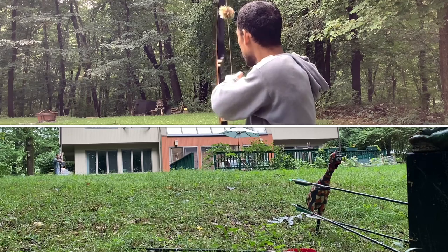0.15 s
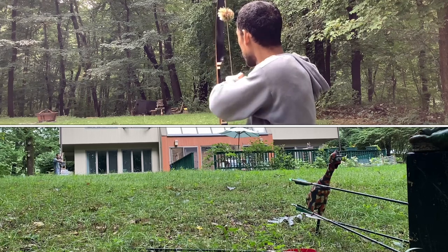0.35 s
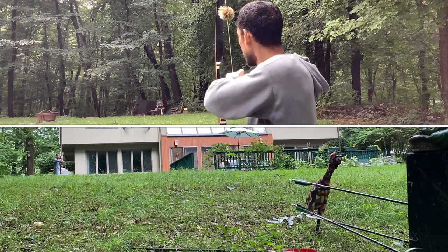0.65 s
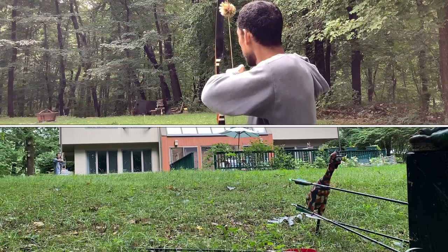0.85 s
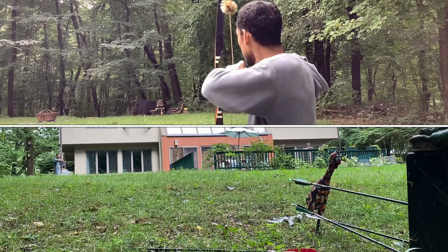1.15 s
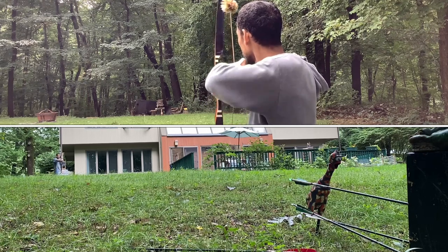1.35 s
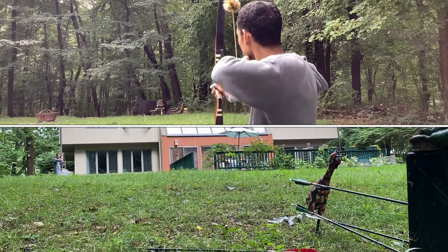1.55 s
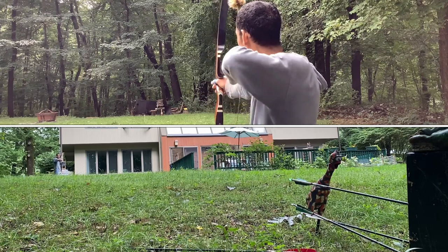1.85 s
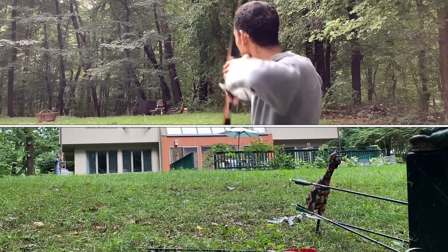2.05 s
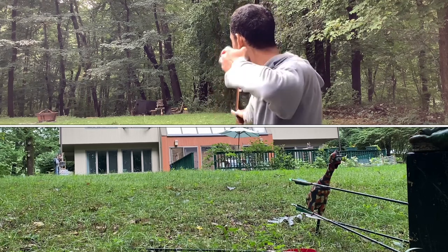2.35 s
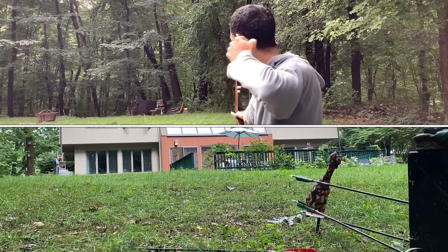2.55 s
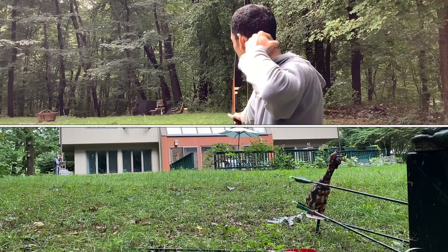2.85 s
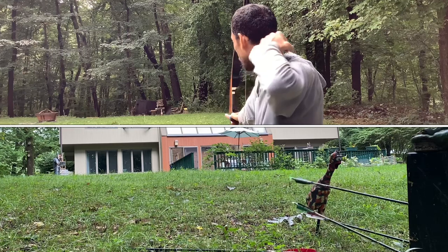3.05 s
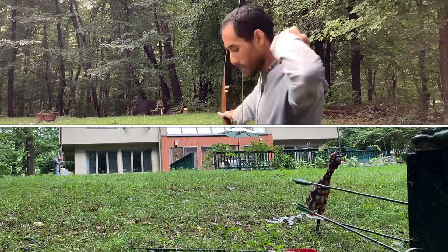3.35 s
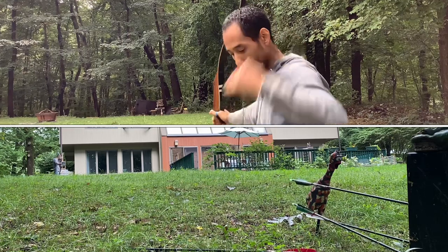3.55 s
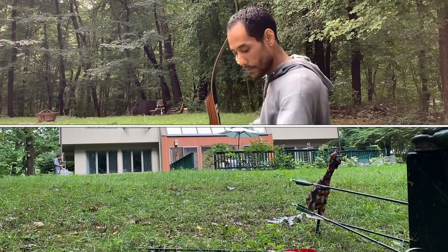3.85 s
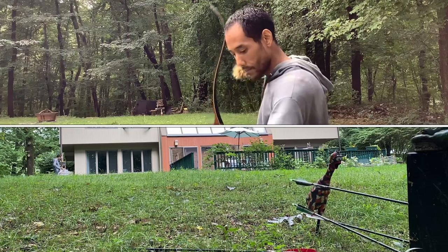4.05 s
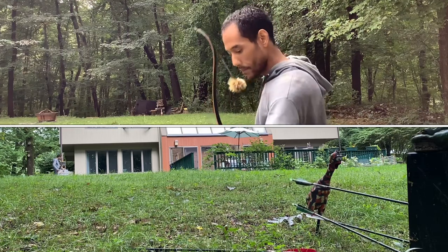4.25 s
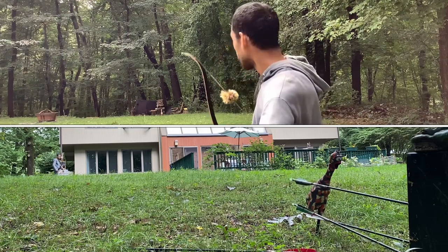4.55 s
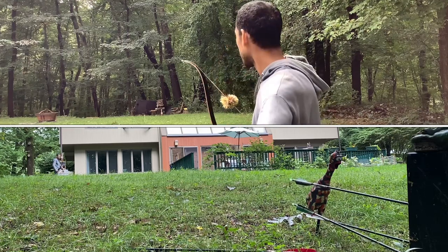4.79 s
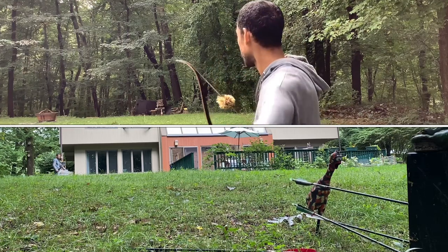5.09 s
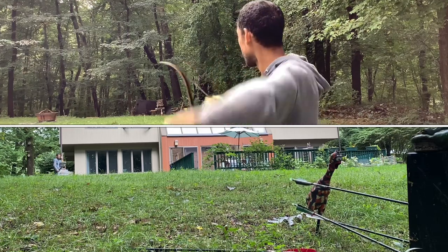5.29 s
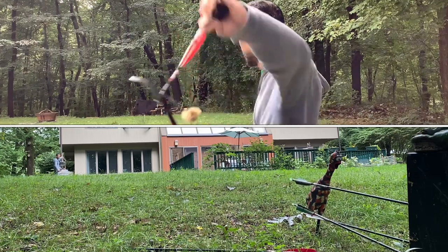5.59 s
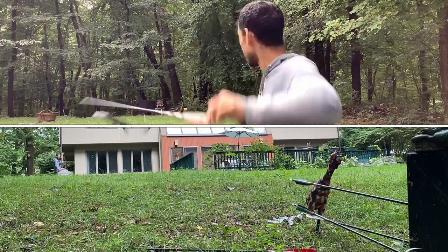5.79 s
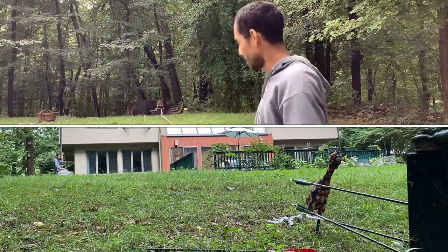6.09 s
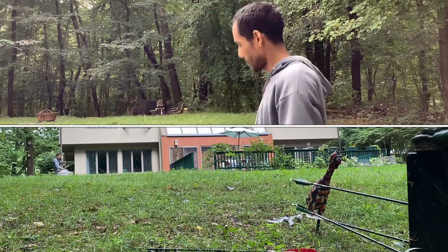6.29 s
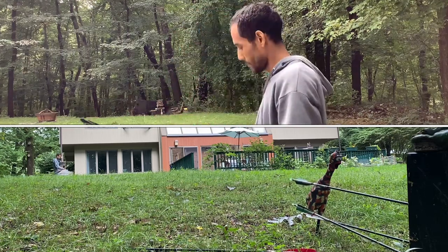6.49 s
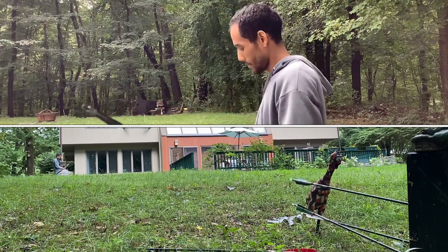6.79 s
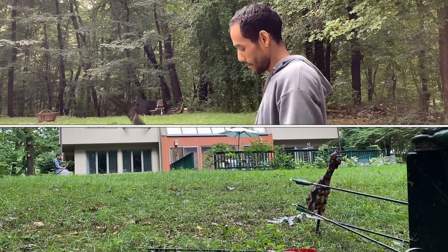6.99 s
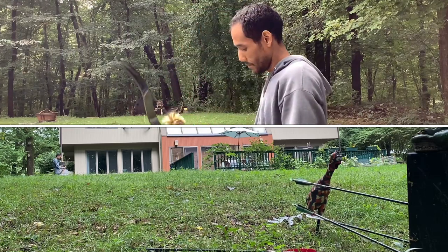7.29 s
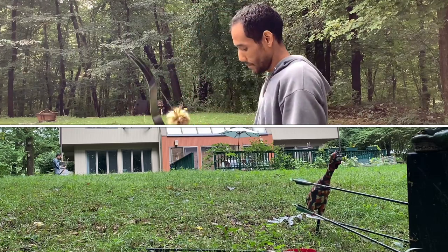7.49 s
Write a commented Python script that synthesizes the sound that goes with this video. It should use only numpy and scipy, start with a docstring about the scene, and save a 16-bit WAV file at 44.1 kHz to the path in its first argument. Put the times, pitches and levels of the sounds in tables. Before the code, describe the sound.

A bow lets go with a light woody snap, an arrow thumps sharply into a close target, then sleeve rustle and small knocks over steady crickets.

```python
"""Wooded yard: an archer's arrow slides past the bow as noise, the string thrums as dying modes and feathers hiss.
Half a second later it thumps into a target near a stereo microphone: falling sweep, noise crack, thud and echoes;
the target settles with small knocks and rubs. Near the archer, in mono, a sleeve rustles (grainy noise), bow and
shafts knock (sparks and wooden modes), and the next arrow scrapes out of the quiver (noise through tube resonances).
Crickets chirr (throbbing noise) over far traffic (shaped noise); one engine (wavering sines) revs and changes gear."""
import sys
import numpy as np
from scipy import signal
from scipy.fft import rfft, irfft, next_fast_len
from scipy.io import wavfile
from scipy.ndimage import uniform_filter1d

SR = 44100
rng = np.random.default_rng(int(sys.argv[2]) if len(sys.argv) > 2 else 0)


def store_wav(level_fs):
    """Save 16-bit WAV to argv[1]."""
    pcm = np.round(np.clip(np.atleast_2d(level_fs), -1, 1) * 32767)
    wavfile.write(sys.argv[1], SR, pcm.T.astype(np.int16))


N = 336483
STRIKE_S = 2.3936  # arrow meets target

# Wooden modes of the knocking parts. Each row: frequency in Hz, width in Hz, relative level in dB.
WOOD_MODES = [(855, 380, -1), (1440, 390, -3.5), (2140, 440, -4), (2530, 870, -10.5), (4000, 1700, -15)]


def gain_of(db):
    """dB to amplitude gain."""
    return 10 ** (np.asarray(db) / 20)


def evened(x):
    """Scales to rms 1."""
    return x / np.sqrt(np.mean(x ** 2) + 1e-20)


def read(points, hz):
    """Interpolates a table on a log-frequency axis."""
    f, value = np.transpose(points)
    return np.interp(np.log(hz + 1), np.log(f + 1), value)


def add(mix, start_s, sound):
    """Mixes a sound in at a time, cut at the end of the mix."""
    part = mix[..., round(start_s * SR):][..., :sound.shape[-1]]
    part += sound[..., :part.shape[-1]]


def curve(rows):
    """Interpolates the columns of a timed table at every sample of its span."""
    s, *columns = np.transpose(rows)
    t = np.arange(s[0], s[-1], 1 / SR)
    return [np.interp(t, s, c) for c in columns]


def colour(x, points):
    """Shapes a signal by a relative spectrum, rms 1."""
    size = next_fast_len(x.shape[-1])
    gain = gain_of(read(points, np.fft.rfftfreq(size, 1 / SR)))
    return evened(irfft(rfft(x, size) * gain, size)[..., :x.shape[-1]])


def resonate(x, hz, width_hz):
    """One-pole resonance, shifted to follow the frequency hz."""
    turn = np.exp(2j * np.pi * np.cumsum(hz * np.ones(len(x))) / SR)
    r = np.exp(-np.pi * width_hz / SR)
    return 2 * (turn * signal.lfilter([1 - r], [1, -r], x / turn)).real


def ring(modes):
    """Exponentially dying modes after one soft blow."""
    t = np.arange(SR // 3) / SR
    rise = 1 - np.exp(-t / 0.003)
    return rise * sum(gain_of(db - 60 * t / t60_s) * np.sin(2 * np.pi * hz * t) for hz, db, t60_s in modes)


def swell(rise_s, hold_s, fall_s):
    """Envelope that climbs, holds and falls linearly in dB, offset to end in silence."""
    range_db = 25
    end_s = rise_s + hold_s + fall_s
    t = np.arange(0, end_s, 1 / SR)
    db = np.interp(t, [0, rise_s, rise_s + hold_s, end_s], [-range_db, 0, 0, -range_db])
    return (gain_of(db) - gain_of(-range_db)) / (1 - gain_of(-range_db))


def from_target(x):
    """Off to the right of the stereo microphone: the left port hears it later."""
    port_lag_s = .000272
    return np.array([np.pad(x, (round(port_lag_s * SR), 0))[:len(x)], x])


def strike():
    """A bending wave in the target, treble first, sweeps down; the body thuds in low modes."""
    # Each row: frequency in Hz, level in dB, t60 in s.
    thud_modes = [(76.6, -11.5, 0.07), (122, -22, 0.075), (247, -20, 0.062), (503, -40, .08),
                  (740, -29, 0.061)]
    thud_s = 2.4145
    from_hz, to_hz, sink_s = 1230, 200, .005
    rise_s, last_s, fall_s = 0.0049, 0.012, 0.0083
    sweep_db, sag_db_per_s = -6, 470
    shape = swell(rise_s, last_s - rise_s, fall_s)
    t = np.arange(len(shape)) / SR
    shape = shape * gain_of(sweep_db - sag_db_per_s * np.maximum(t - rise_s, 0))
    hz = to_hz + (from_hz - to_hz) * np.exp(-t / sink_s)
    turns = np.cumsum(hz) / SR
    # a faster wave rides on top
    upper = gain_of(6.5 - 60 * t / 0.025) * np.sin(2 * np.pi * 1.95 * turns)
    hit = np.zeros(SR)
    add(hit, 0, shape * (np.sin(2 * np.pi * turns) + upper))
    add(hit, thud_s - STRIKE_S, ring(thud_modes))
    return hit


def returns():
    """Impulse response of the yard: echoes off house and trees, smeared by leaves and walls, over a short tail."""
    # Each row: delay in s, relative level in dB.
    echoes = [(.037, -29), (.052, -25.5), (.084, -29), (.096, -23), (.135, -24), (.15, -27), (.21, -34)]
    # Each row: frequency in Hz, relative level in dB.
    tail_colour = [(60, -34), (150, -3), (400, -3.5), (800, -6), (1500, -17), (4000, -1.5)]
    t = np.arange(SR) / SR
    tail = rng.standard_normal((2, SR)) * gain_of(-46.0 - 60 * t / 0.5) * (t > .012)
    age = t[:1500]
    for delay_s, echo_db in echoes:
        smear = gain_of(echo_db - 17.5 - 60 * age / 0.032) * (1 - np.exp(-age / .004))
        add(tail, delay_s, smear * rng.standard_normal(1500))
    return colour(tail, tail_colour) * tail.std()


def crack():
    """The point splits the fibres: ragged noise, creaking on, with one echo off a flat wall."""
    # Each row: frequency in Hz, relative spectrum in dB per Hz.
    crack_colour = [(700, -30), (1100, -3), (1690, 3), (3150, -8.5), (3550, -28), (4000, -8.5), (5380, -11),
                    (6430, -7.5), (8830, -27), (11100, -21.5), (16000, -28)]
    crack_db, echo_delay_s, echo_db = -15, .083, -15
    t = np.arange(SR) / SR
    ragged = gain_of(5.7 * evened(uniform_filter1d(rng.standard_normal(SR), size=30)))
    shared, left, right = ragged * rng.standard_normal((3, SR))
    noise = colour(from_target(shared) + .4 * np.array([1.6 * left, right]), crack_colour)
    noise = noise * gain_of(crack_db) * (1 - np.exp(-t / .0015))
    echo = noise.mean(0) * gain_of(echo_db - 60 * t / 0.013)
    split, creak = gain_of(-60 * t / 0.03), gain_of(-25 - 60 * t / 0.18)
    out = noise * (split + creak)
    add(out, echo_delay_s, echo)
    return out


def impact():
    """Sweep and thud, crack and returns; the far left port hears the body later, duller and softer."""
    thump_lag_s, side_db = .00023, 1.8
    hit = strike()
    returned = signal.fftconvolve(hit[None], returns(), axes=1)[:, :SR]
    out = np.zeros((2, N))
    add(out, STRIKE_S, returned + crack())
    add(out[0], STRIKE_S + thump_lag_s, gain_of(-side_db) * uniform_filter1d(hit, size=9))
    add(out[1], STRIKE_S, gain_of(side_db) * hit)
    return out


def release():
    """Feathers and shaft hiss past the bow by friction, then the string slaps home and thrums in its modes."""
    # Each row: frequency in Hz, relative spectrum in dB per Hz.
    slide_colour = [(240, -39), (400, 0), (489, -4), (730, -6), (1060, -9.5), (2930, -8.5), (3640, -17),
                    (4240, -6), (5110, -13), (12900, -18.5), (16000, -33)]
    # Where the slide catches harder. Each row: start in s, level in dB.
    scuffs = [(1.911, -40.5), (1.931, -39)]
    # Each row: frequency in Hz, level in dB, t60 in s.
    string_modes = [(119, -28.5, 0.13), (223, -35.5, 0.17), (331, -47, 0.26), (498, -41, 0.14),
                    (660, -42, 0.15), (940, -46, .08), (2400, -48, .1), (4230, -46, 0.085)]
    slide_s, rise_s, hold_s, fall_s, slide_db = 1.912, .004, 0.044, 0.051, -46
    scuff_t60_s, string_s = .05, 1.930
    level = gain_of(slide_db) * swell(rise_s, hold_s, fall_s)
    t = np.arange(len(level)) / SR
    for s, db in scuffs:
        add(level, s - slide_s + rise_s, gain_of(db - 60 * t / scuff_t60_s))
    out = np.zeros(N)
    add(out, slide_s - rise_s, level * colour(rng.standard_normal(len(level)), slide_colour))
    add(out, string_s, ring(string_modes))
    return out


def flight():
    """Feather hiss grows as 1/distance while the arrow nears the target."""
    # Each row: frequency in Hz, relative spectrum in dB per Hz.
    flight_colour = [(2000, -12), (7000, -5), (11000, -3), (16000, -5)]
    start_s, speed_m_per_s, target_m, db_at_1_m = 1.97, 44, 1.8, -54
    left_s = np.arange(STRIKE_S - start_s, 0, -1 / SR)
    distance_m = np.hypot(target_m, speed_m_per_s * left_s)
    hiss = colour(rng.standard_normal(len(left_s)), flight_colour)
    out = np.zeros(N)
    add(out, start_s, gain_of(db_at_1_m) * hiss / distance_m)
    return from_target(out)


def ticks():
    """Small knocks of bow, nock and shafts, and of the target as it settles: a noise spark and a short wooden ring."""
    # Each row: start in s, relative spark level in dB, relative ring level in dB, pitch factor on the ring.
    knocks = [(1.9214, -50, -18, 0.95), (1.9258, -49, -28, 1.1), (1.931, -32, -26, 1.1),
              (1.9674, -55, -49, 1.02), (2.5944, -46, -50, 0.85), (2.605, -49, -55, 1.2),
              (2.611, -63, -47, 1.2), (2.6594, -58, -51, 0.73), (2.6858, -62, -50, 0.9),
              (2.83, -67, -48, 1.02), (3.0208, -64, -59, 1.02), (4.135, -65, -50, 1.3),
              (4.6743, -78, -41, 0.92), (4.722, -77, -45, 1.3), (5.34, -52, -46, 1.16),
              (5.367, -63, -51, 1.2), (6.6772, -60, -44, 0.71), (6.7844, -67, -58, 1.02),
              (6.8149, -67, -59, 0.93), (6.8828, -64, -61, 1.2), (6.8944, -68, -53, 0.73)]
    spark_t60_s = 0.011
    out, t = np.zeros(N), np.arange(1500) / SR
    contact = 1 - np.exp(-t / 0.00022)
    sparks = np.diff(rng.standard_normal((len(knocks), len(t) + 1)))
    for (s, spark_db, ring_db, pitch), spark in zip(knocks, sparks):
        wood = np.zeros(len(t))
        for k, (hz, width_hz, db) in enumerate(WOOD_MODES):
            mode = np.exp(-np.pi * width_hz * t) * np.sin(2 * np.pi * pitch * hz * t)
            wood += (-1) ** k * gain_of(db) * mode
        add(out, s, gain_of(spark_db - 60 * t / spark_t60_s) * spark + gain_of(ring_db) * contact * wood)
    return out


def zings():
    """Falling sine whistles, each with a resonant noise hiss swelling around it."""
    # Each row: start in s, from Hz, to Hz, length in s, whistle peak in dB.
    whistles = [(2.541, 13000, 9800, .012, -60), (6.029, 14000, 7500, .018, -57.5)]
    out, age = np.zeros(N), np.arange(SR // 4) / SR
    for s, from_hz, to_hz, length_s, db in whistles:
        hz = np.geomspace(from_hz, to_hz, round(length_s * SR))
        whistle = np.sin(2 * np.pi * np.cumsum(hz) / SR) * signal.windows.tukey(len(hz), .6)
        add(out, s, gain_of(db) * whistle)
        hiss = evened(resonate(resonate(rng.standard_normal(len(age)), 10300, 1500), 12000, 1500))
        hiss_level = gain_of(db - 2.5 - 60 * age / 0.53) * (1 - np.exp(-age / .012))
        add(out, s - .016, hiss_level * hiss)
    return out


def rattles():
    """Two parts bounce quickly: a sparse, dying impulse train rings the wooden modes."""
    # Each row: start in s, peak in dB, t60 of the bouncing in s.
    runs = [(1.9495, -40, .015), (4.2806, -33, .02), (4.696, -50, .015), (5.417, -54, .015)]
    out, t = np.zeros(N), np.arange(1500) / SR
    size = (len(runs), len(t))
    bounces = rng.standard_normal(size) * (rng.random(size) < .04)
    for (s, db, t60_s), train in zip(runs, bounces):
        first = 3 * (t == t[5])
        train = uniform_filter1d(train + first, size=9) * gain_of(-60 * t / t60_s)
        rung = sum(gain_of(mode_db) * resonate(resonate(train, hz, width_hz), hz, width_hz)
                   for hz, width_hz, mode_db in WOOD_MODES)
        add(out, s, gain_of(db) * rung / abs(rung).max())
    return out


def rubbing():
    """Cloth, shafts and the struck target's fibres catch and slip: grainy noise in two colours under each stroke."""
    # Each row: time of full level in s, rise in s, hold in s, fall in s, treble level in dB, middle level in dB.
    strokes = [(1.962, .004, .003, 0.26, -58, -55), (2.413, .006, .003, 0.32, -57, -56),
               (2.587, .1, .02, 0.14, -59.5, -68), (4.283, .003, .003, 0.078, -74, -55),
               (4.695, 0.049, .005, .05, -88, -61), (5.05, 0.17, 0.16, .1, -57.5, -59.5),
               (5.247, 0.16, 0.087, 0.039, -55, -55), (5.367, .015, .004, 0.073, -61, -60.5),
               (6.043, 0.051, .006, .14, -60, -70), (6.572, .04, .005, .08, -73, -73),
               (6.81, 0.11, 0.0058, .07, -69, -65), (6.886, .025, 0.0059, 0.17, -65, -73),
               (7.38, 0.049, .06, .06, -70, -74)]
    # Each row of both: frequency in Hz, relative spectrum in dB per Hz.
    treble_colour = [(2350, -22), (4000, -6.5), (4540, -1), (7140, -7), (9940, -6), (15100, -10.5),
                     (16000, -9)]
    middle_colour = [(290, -57), (500, 9.5), (523, -9.5), (938, 3), (1140, -6.5), (2400, -3), (3490, -9),
                     (4500, -15), (7000, -29), (9100, -69), (15400, -120)]
    grain_db = 1.8 * evened(uniform_filter1d(rng.standard_normal(N), size=250))
    grain = rng.standard_normal(N) * gain_of(grain_db)
    treble, middle = colour(grain, treble_colour), colour(grain, middle_colour)
    out = np.zeros(N)
    for s, rise_s, hold_s, fall_s, treble_db, middle_db in strokes:
        shape = swell(rise_s, hold_s, fall_s)
        first = round((s - rise_s) * SR)
        at = slice(first, first + len(shape))
        add(out, s - rise_s, shape * (gain_of(treble_db) * treble[at] + gain_of(middle_db) * middle[at]))
    return out


def quiver():
    """The shaft scrapes out: friction noise rings the modes of a tube, each flaring up on its own."""
    # Lowest note of the tube. Each row: time in s, frequency in Hz.
    tube_pitch = [(5.0, 880), (5.2, 760), (5.25, 857), (5.4, 770)]
    full_s, rise_s, hold_s, fall_s, scrape_db = 5.2, .36, .07, .2, -49
    shape = swell(rise_s, hold_s, fall_s)
    hz = np.interp(full_s - rise_s + np.arange(len(shape)) / SR, *np.transpose(tube_pitch))
    tube = np.zeros(len(hz))
    # Each pair: ratio to the lowest note, relative level in dB.
    for ratio, mode_db in [(1, 0.5), (1.3, -4), (1.7, -2.5), (2.3, -1.5), (2.9, 0.5), (3.5, -3), (4.6, -11)]:
        noise, flare = rng.standard_normal((2, len(hz)))
        flare_db = 5 * evened(uniform_filter1d(flare, size=1200))
        tube = tube + gain_of(mode_db + flare_db) * resonate(noise, ratio * hz, 98.4)
    out = np.zeros(N)
    add(out, full_s - rise_s, gain_of(scrape_db) * shape * evened(tube))
    return out


def engines():
    """Low notes, a sine plus narrow noise each, that waver on their long way through the air; brief far tones."""
    # Each row: time in s, firing frequency in Hz, level before the throb in dB, half-order level in dB.
    engine = [(0, 152.7, -66, -51), (.5, 146.2, -62.5, -57), (.85, 126.5, -55.5, -56),
              (1.2, 136, -50.5, -53), (1.7, 136, -51.5, -50), (2.6, 142.1, -55, -51.5),
              (3.1, 149.1, -51.5, -55.5), (4.0, 155.7, -49, -49.5), (4.3, 156, -54, -62),
              (4.5, 157.1, -50, -48.5), (5.2, 160.8, -51.5, -50), (5.7, 161.6, -45.5, -43.5),
              (5.95, 157, -46.5, -55), (6.32, 129.8, -43.5, -56), (6.45, 126, -65, -60),
              (7.63, 126, -52.5, -59)]
    # A lower, fuzzy note. Each row: time in s, frequency in Hz, level in dB.
    drone = [(0, 60, -69), (1.3, 64, -72), (3.4, 59, -62), (4.2, 58, -74), (6, 59, -59), (6.8, 56, -47.5),
             (7.63, 55, -48.5)]
    # Each row: start in s, end in s, frequency in Hz, peak in dB.
    far_tones = [(0, 0.404, 1483, -74.5), (0.307, 0.807, 385.5, -61), (1.3, 1.645, 1458, -71.5),
                 (3.948, 4.346, 254.7, -56.5), (6.747, 7.4, 250, -56.5)]
    throb_hz, throb_peak_s, throb_db = 2.202, 4.5, 2
    out = np.zeros(N)
    hz, db, half_db = curve(engine)
    t = np.arange(len(db)) / SR
    db = db + throb_db * np.cos(2 * np.pi * throb_hz * (t - throb_peak_s))
    drone_hz, drone_db = curve(drone)
    for f, level_db, width_hz in [(hz, db, 3.0), (hz / 2, half_db, 4.0), (drone_hz, drone_db, 8.0)]:
        waver = evened(resonate(rng.standard_normal(len(f)), f, width_hz))
        steady = np.sqrt(2) * np.sin(2 * np.pi * np.cumsum(f) / SR)
        add(out, 0, gain_of(level_db) * (.3 * waver + .95 * steady))
    for start_s, end_s, f, peak_db in far_tones:
        t = np.arange(0, end_s - start_s, 1 / SR)
        tone = np.sin(2 * np.pi * f * t) * signal.windows.tukey(len(t), .3)
        add(out, start_s, gain_of(peak_db) * tone)
    return out


def spread(x):
    """Two unrelated signals become left and right of a wide outdoor field."""
    # Each row: frequency in Hz, left-right correlation.
    likeness = [(60, 1), (130, 0.9), (290, 0.77), (640, 0.3), (1410, 0.036), (3100, 0.55), (6820, 0.44),
                (15000, -0.14)]
    # Each row: frequency in Hz, left minus right in dB.
    side_lean = [(60, -1), (110, 2), (200, 0), (380, 0.5), (700, 0), (1290, -0.5), (2380, 2.5), (4400, 3.5),
                 (8120, 1), (15000, -0.5)]
    size = next_fast_len(N)
    hz, (a, b) = np.fft.rfftfreq(size, 1 / SR), rfft(x, size)
    same = np.clip(read(likeness, hz), -1, 1)
    lean = gain_of(read(side_lean, hz) / 2)
    left = a * lean
    right = (same * a + np.sqrt(1 - same ** 2) * b) / lean
    return irfft(np.array([left, right]), size)[:, :N]


def traffic():
    """Far traffic wash: shaped noise, levelled by its middle band."""
    # Each row: frequency in Hz, relative spectrum in dB per Hz.
    traffic_colour = [(21, -37), (35, -5.5), (71, -0.5), (142, -6), (200, -8.5), (265, -13.5), (455, -20.5),
                      (829, -21.5), (1920, -37.5), (2700, -40), (3050, -46.5), (3800, -48), (4200, -47.5),
                      (5460, -53), (9240, -120)]
    # Each row: time in s, level of the middle band in dB.
    middle_level = [(0.0, -54), (1.74, -54.5), (2.0, -52), (2.6, -52), (2.95, -53), (5.0, -52),
                    (7.63, -51.5)]
    middle_hz = (180, 1200)  # band edges in Hz
    wash = colour(rng.standard_normal((2, N)), traffic_colour)
    middle = signal.sosfilt(signal.butter(4, middle_hz, "band", fs=SR, output="sos"), wash)
    level_db = np.interp(np.arange(N) / SR, *np.transpose(middle_level))
    return wash / middle.std() * gain_of(level_db)


def crickets():
    """A chorus as shaped noise; wing strokes throb loosely at two drifting rates."""
    # Each row: frequency in Hz, relative spectrum in dB per Hz.
    cricket_colour = [(2240, -51), (3800, -35), (4120, -18.5), (4620, -3), (4890, 3.5), (5390, -3),
                      (6190, 4), (6750, -4.5), (7660, -27), (8020, -78), (8590, -105), (9470, -26),
                      (11700, -24.5), (14200, -48), (15000, -36)]
    chorus_db = -59
    rate_hz, depth_db = np.array([[62], [108]]), np.array([[1.5], [1.2]])
    drift = uniform_filter1d(rng.standard_normal((2, N)), size=4000)
    turns = np.cumsum(rate_hz * (1 + 6.1 * drift), axis=1) / SR
    throb = gain_of((depth_db * np.sin(2 * np.pi * turns)).sum(0))
    return gain_of(chorus_db) * colour(throb * rng.standard_normal((2, N)), cricket_colour)


def scene():
    """Wide yard, archer in the centre, target and some small sounds off to the right."""
    # When small sounds come from the target's side. Each row: from s, to s.
    at_target = [(2.3936, 2.72), (5.97, 6.3), (6.66, 6.7)]
    t = np.arange(N) / SR
    small = rubbing() + ticks() + zings()
    there = np.any([(t > start_s) & (t < end_s) for start_s, end_s in at_target], axis=0)
    small = small * ~there + from_target(small * there)
    near = release() + small + quiver() + rattles()
    return near + flight() + impact() + engines() + spread(traffic() + crickets())


def record(dry):
    """The microphones drop the deepest bass; a linear-phase low-pass then limits the band."""
    edge_hz = 15900
    dry = signal.sosfilt(signal.butter(2, 45, "high", fs=SR, output="sos"), dry)
    return signal.oaconvolve(dry, signal.firwin(511, edge_hz, window=("kaiser", 9), fs=SR)[None], "same")


dry = scene()
out = record(dry)
store_wav(out)
```